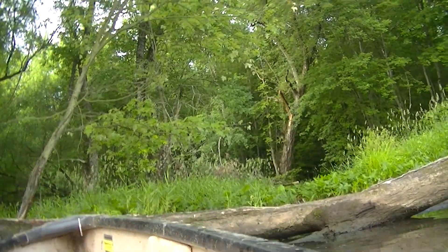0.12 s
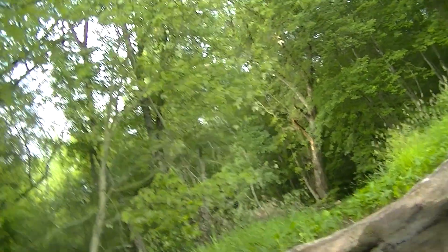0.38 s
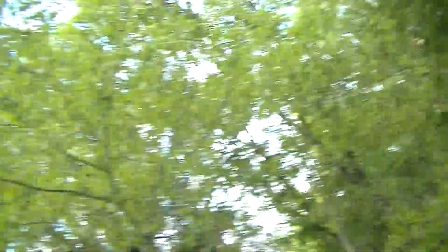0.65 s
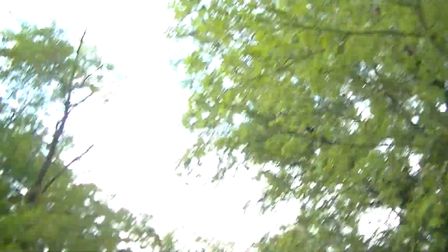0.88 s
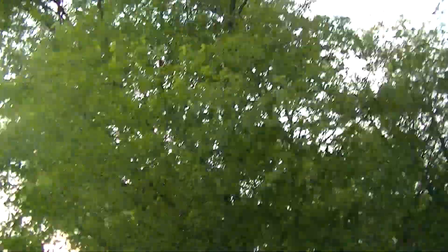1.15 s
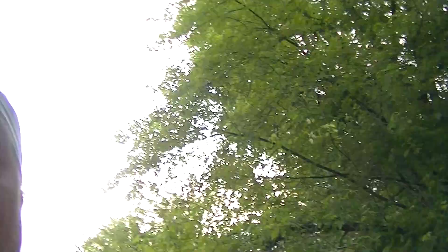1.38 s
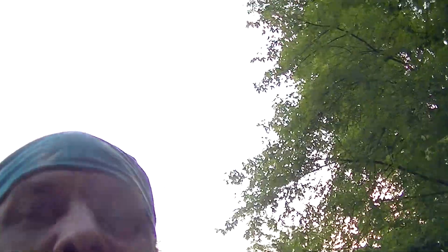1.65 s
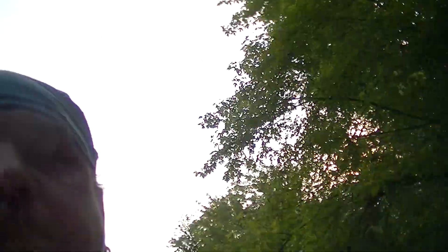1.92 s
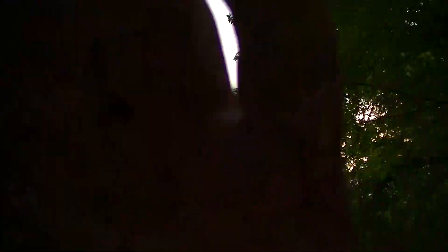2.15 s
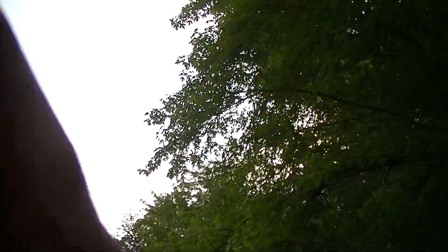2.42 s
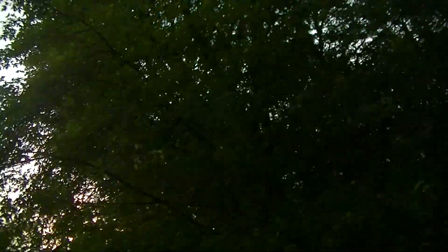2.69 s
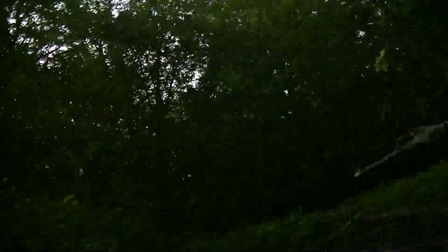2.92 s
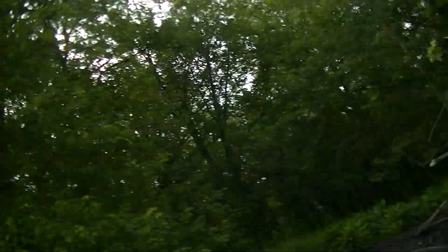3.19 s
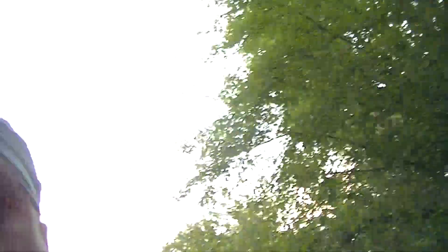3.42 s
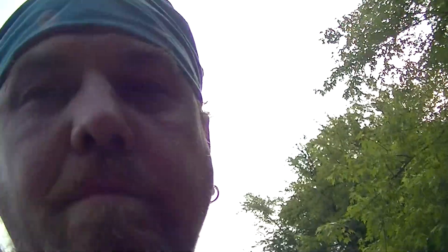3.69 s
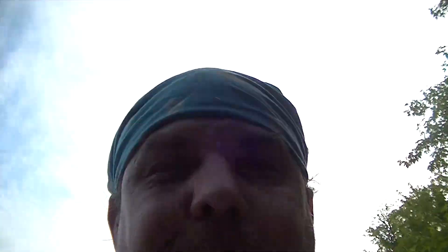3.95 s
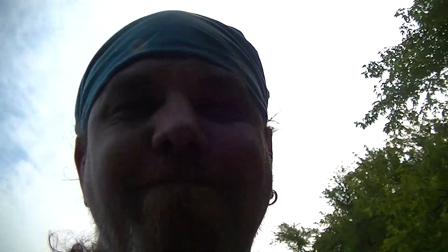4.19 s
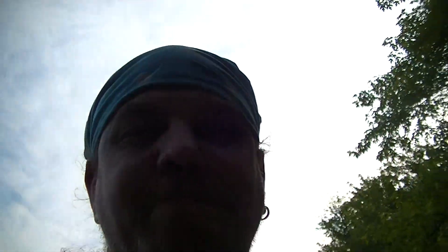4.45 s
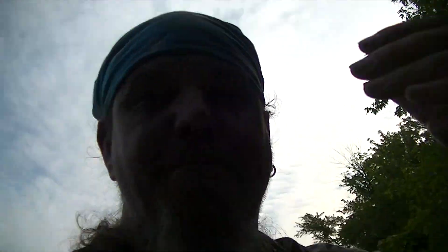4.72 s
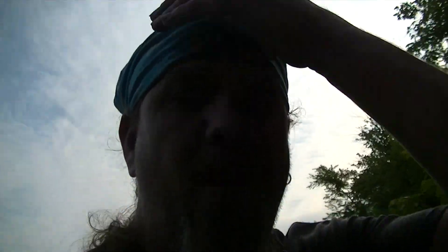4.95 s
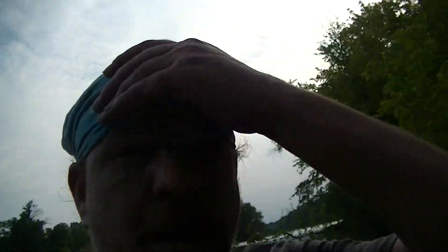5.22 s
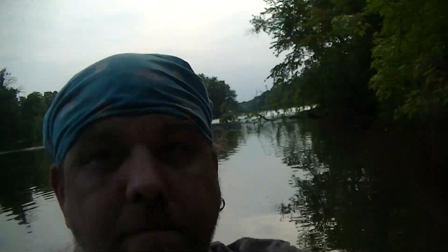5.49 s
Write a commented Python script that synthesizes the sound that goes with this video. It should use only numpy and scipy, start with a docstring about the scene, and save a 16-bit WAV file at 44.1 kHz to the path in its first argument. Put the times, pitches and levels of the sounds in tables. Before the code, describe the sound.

A small camera is rubbed, knocked and snapped about in a boat, loud clunks over faint river wash, then a songbird whistles and chips.

```python
"""A hand handles a small camera in a boat on a wooded river: friction noise rubs over its case, plastic
parts snap and ping as decaying tones, its mount knocks on the modes of the hull and creaks by stick-slip.
A songbird nearby sings near-sine whistles and falling chips, modulated in level and phase, which ring on
among the trees as sparse echoes. River and leaves are a soft wash of shaped noise."""
import sys
import numpy as np
from scipy import signal
from scipy.io import wavfile
from scipy.ndimage import uniform_filter1d

SR = 44100
rng = np.random.default_rng(int(sys.argv[2]) if len(sys.argv) > 2 else 0)


def to_wav(s):
    """Save 16-bit WAV."""
    ch = np.atleast_2d(s).T  # columns
    pcm = np.round(np.clip(ch, -1, 1) * 32767)  # PCM
    wavfile.write(sys.argv[1], SR, pcm.astype(np.int16))


def how_loud(loudness_db):
    """Turn decibels into a plain amplitude multiplier (0 dB gives 1, 20 dB gives 10)."""
    steps = np.asarray(loudness_db, float) / 20
    return 10 ** steps


N = 246959
BIN_HZ, FRAME_S = np.fft.rfftfreq(512, 1 / SR), np.arange(N // 128 + 5) * 128 / SR  # noise grid


def evened(x):
    """Normalization: scales to rms 1."""
    return x / np.sqrt(np.mean(x ** 2) + 1e-20)


def peaked(x, db):
    """Normalization: scales to a peak level."""
    return how_loud(db) * x / abs(x).max()


def read(points, hz):
    """Spectral envelope: interpolates points on a log-frequency axis."""
    f, value = np.transpose(points)
    return np.interp(np.log(hz + 1), np.log(f + 1), value)


def bump(hz, width):
    """Resonance curve: a single peak over the noise bins, width at half height."""
    return 1 / (1 + (2 * (BIN_HZ - hz) / width) ** 2)


def band(x, lo_hz, hi_hz):
    """Band-pass filtering with gentle slopes."""
    edges = np.clip([lo_hz, hi_hz], 50, 20000)
    return signal.sosfilt(signal.butter(2, edges, "bandpass", fs=SR, output="sos"), x)


def add(mix, s, sound, pan_db):
    """Intensity stereo: places a sound in time; pan_db is the level of left over right."""
    part = mix[:, round(s * SR):][:, :len(sound)]
    part += how_loud([[pan_db / 2], [-pan_db / 2]]) * sound[:part.shape[1]]


def ring(modes, stretch, size):
    """Modal synthesis: dying sines of alternating sign, as neighbouring modes swing against each other."""
    t = np.arange(size) / SR
    total = np.zeros(size)
    for k, (hz, db, t60) in enumerate(modes):
        decay = how_loud(db - 60 * t / (t60 * stretch))
        total += (-1) ** k * decay * np.sin(2 * np.pi * hz * t)
    return total


def crowd(table, count):
    """Modal density: many close modes at chance places and strengths under a smooth outline."""
    edges_hz, outline_db, outline_t60 = np.transpose(table)
    place, strength = rng.random((count, 2)).T
    hz = edges_hz[0] * (edges_hz[-1] / edges_hz[0]) ** ((np.arange(count) + place) / count)
    db = np.interp(np.log(hz), np.log(edges_hz), outline_db)
    t60 = np.interp(np.log(hz), np.log(edges_hz), outline_t60)
    return np.transpose([hz, db - 5 * strength, t60])


def hiss(field_db, same, patchy_db):
    """Partial coherence: stereo noise of random short-time spectra shaped by a bins x frames field."""
    a, b, c, d, patches = rng.standard_normal(field_db.T.shape + (5,)).T
    patches = uniform_filter1d(patches, size=6, axis=0)
    patches = evened(uniform_filter1d(patches, size=12, axis=1))
    left = a + 1j * b
    right = same * left + np.sqrt(1 - same ** 2) * (c + 1j * d)
    spectra = np.array([left, right]) * how_loud(field_db + patchy_db * patches)
    return signal.istft(spectra, nperseg=512, noverlap=384)[1][:, :N]


# Spectrum of river and leaves: (frequency [Hz], relative density [dB])
WASH_SPECTRUM = [(24, -63.5), (40, -42), (222, -7), (562, -2), (761, 0), (1110, -3.5), (2080, -6.5),
                 (2300, -6.5), (4660, -9.5), (8740, -17), (12800, -20.5), (15200, -24), (16400, -33.5)]
# Left-right likeness of the wash: (frequency [Hz], correlation [0-1])
WASH_LIKENESS = [(60, 0.5), (180, 0.93), (550, 0.87), (1650, 0.76), (4970, 0.87), (15000, 0.97)]


def wash():
    """Superposed far sources: river and leaves merge into smooth, partly coherent noise."""
    same = np.clip(read(WASH_LIKENESS, BIN_HZ), -1, 1)[:, None]
    field_db = read(WASH_SPECTRUM, BIN_HZ)[:, None] + 0 * FRAME_S
    return how_loud(-52.5) * evened(hiss(field_db, same, patchy_db=2.2))


# Strokes of a hand sliding on the case:
# (start [s], length [s], relative pressure [dB], hollow ring [dB], port whistle [dB])
STROKES = [(0.0, 0.19, -52.5, -12, 2), (0.173, 0.069, -49, 14, -11), (0.203, 0.097, -46, 6, 8.5),
           (0.269, 0.1, -43, 7.5, 9), (0.311, 0.13, -52.5, 5, -5), (0.492, 0.19, -47, -19, -2.5),
           (0.701, 0.063, -54.5, 9, -2), (0.771, 0.15, -44, 12.5, 0.5), (0.859, 0.22, -45.5, 11.5, -4.5),
           (1.025, 0.35, -44, 5.5, 0.5), (1.248, 0.25, -47.5, 5, -3), (1.352, 0.36, -43, 3, 2.5),
           (2.53, 0.082, -59.5, 6, 5), (2.628, 0.19, -50, -20, 5), (2.776, 0.14, -57.5, -10, 5.5),
           (3.176, 0.046, -53, -7, -1), (3.28, 0.093, -55.5, 1, -10)]
# Spectrum of skin on plastic: (frequency [Hz], relative density [dB])
RUB_SPECTRUM = [(59, -67), (100, -66), (343, -2.5), (424, -8), (721, -4), (950, -8), (1080, -5),
                (1610, -12), (4380, -12), (8640, -34.5), (16000, -46.5)]
# Fixed rings of the case: (frequency [Hz], width [Hz], height [dB])
RUB_RESONANCES = [(1980, 270, 7), (2370, 170, 3.5), (6500, 840, 4.5)]
# Rings that open and shut under the palm: (frequency [Hz], width [Hz])
PALM_HOLLOW = [(1080, 36), (1400, 300)]
# The microphone opening sings as skin passes it: (frequency [Hz], width [Hz])
MIC_PORT = (4600, 850)


def rubs():
    """Friction noise: skin drags on plastic through the case's resonances, one swell for each stroke."""
    skew, point = 1.15, 0.9  # the pressure swells to a late top and lets go
    bright_db, bright_per_db, usual_db = 3.0, 0.079, -43.5  # tilt [dB/octave] at usual pressure; harder is brighter
    colour_db = read(RUB_SPECTRUM, BIN_HZ) + sum(db * bump(hz, width) for hz, width, db in RUB_RESONANCES)
    hollow = sum(bump(hz, width) for hz, width in PALM_HOLLOW)
    octaves = np.log2((BIN_HZ + 100) / 3000)
    power = 1e-20
    for s, length, db, hollow_db, port_db in STROKES:
        progress = np.clip((FRAME_S - s) / length, 0, 1)
        swell = np.sin(np.pi * progress ** skew).clip(0) ** point
        tilt_db = (bright_db + bright_per_db * (db - usual_db)) * octaves
        shape_db = db + colour_db + tilt_db + hollow_db * hollow + port_db * bump(*MIC_PORT)
        power = power + np.outer(how_loud(shape_db), swell) ** 2
    flicker_db = 1.8 * rng.standard_normal(len(FRAME_S))
    return hiss(10 * np.log10(power) + flicker_db - 3, 0.93, patchy_db=1.4)


def sing(out, s, tone, db, taper):
    """Amplitude windowing: tapers a bird's note at both ends and sets its level."""
    add(out, s, np.sqrt(2) * how_loud(db) * tone * signal.windows.tukey(len(tone), taper), 0.4)


# Clear chips: (start [s], length [s], start pitch [Hz], end pitch [Hz], nominal level [dB])
CLEAR_CHIPS = [(0.044, 0.023, 11700, 9800, -50.5), (0.072, 0.01, 7000, 5260, -40),
               (0.079, 0.0113, 4820, 3550, -39), (4.785, 0.04, 3760, 3250, -49),
               (4.837, 0.015, 6020, 5150, -31), (4.842, 0.0086, 5770, 4020, -32),
               (5.24, 0.0288, 3760, 3150, -45), (5.25, 0.016, 7000, 6500, -45.5),
               (5.288, 0.017, 5800, 5330, -30), (5.294, 0.011, 5610, 3850, -32.5),
               (5.55, 0.015, 7500, 6740, -45), (5.562, 0.0044, 7300, 4670, -27.5)]
# Buzzed notes: (start [s], length [s], start pitch [Hz], end pitch [Hz], nominal level [dB])
BUZZED_NOTES = [(4.745, 0.042, 7200, 4530, -48.5), (4.804, 0.039, 6423, 6280, -38),
                (5.261, 0.027, 6090, 5980, -34.5), (5.512, 0.029, 2810, 4020, -38)]


def chips():
    """Phase modulation: an unsteady buzz puts side lines on gliding sines, faint or strong by its depth."""
    out = np.zeros((2, N))
    for notes, buzz_rad in ((CLEAR_CHIPS, 0.11), (BUZZED_NOTES, 1.47)):
        for s, length, start_hz, end_hz, db in notes:
            t = np.arange(0, length, 1 / SR)
            turn = 2 * np.pi * np.cumsum(start_hz + (end_hz - start_hz) * t / length) / SR
            waver = 1.86 * uniform_filter1d(rng.standard_normal(len(t)), size=40)
            buzz_cycles = np.cumsum(486 * (1 + waver)) / SR  # about 486 Hz
            sing(out, s, np.sin(turn + buzz_rad * np.sin(2 * np.pi * buzz_cycles)), db, taper=0.6)
    return out


def echoes(x, t60, after):
    """Multiple scattering: sparse taps of random sign die away, starting some samples after the sound."""
    taps, t = np.zeros((2, SR)), np.arange(SR) / SR
    slots = np.arange(after, SR - 20, 20)
    at = slots + rng.integers(0, 20, (2, len(slots)))
    np.put_along_axis(taps, at, rng.choice([-1., 1.], at.shape), 1)
    taps = (taps + 0.62 * taps[::-1]) * how_loud(-60 * t / t60)  # the two sides share part of the echo
    return signal.fftconvolve(x, taps / np.linalg.norm(taps[0]), axes=1)[:, :N]


def trees(song, handling):
    """Reverberation: near twigs blur each note; trunks and banks answer long after, handling only faintly."""
    scattered = song + how_loud(2.0) * band(song, 3340, 18000)  # leaves scatter the highest notes most
    near = how_loud(-13) * echoes(scattered, t60=0.03, after=40)
    far = echoes(how_loud(-12) * scattered + how_loud(-35) * handling, t60=0.95, after=300)
    return near + far


# Snaps of the plastic case: (time [s], nominal peak [dB], click pitch [Hz],
# case ring re click [dB], treble crack re click [dB])
CASE_SNAPS = [(0.188, -34, 3540, -1, -2), (0.195, -32, 3270, 1.5, -4), (0.5244, -32.5, 5040, -2.5, -18.5),
              (0.772, -22.5, 3340, -2.5, -34), (1.921, -18.5, 2120, -6, -32),
              (2.295, -36, 4670, 11.5, -23.5), (2.299, -12.5, 3730, 1, -12), (2.304, -20, 4150, -14, -3),
              (2.307, -22, 4460, -21, -12), (2.391, 0.5, 2730, -7, -6.5), (2.437, 0.5, 3810, -18, -22),
              (2.495, -10, 4400, -9.5, -8), (2.61, -16, 4080, -9, 0), (2.613, -9, 4600, -13, -7),
              (2.626, -6, 1404, -7.5, -8), (2.654, -19, 2810, -38, -1), (2.6571, -15.5, 2640, -32, -18.5),
              (2.659, -19, 2550, -50, -2.5), (2.662, -17.5, 2650, -33, -18), (2.674, -26, 2910, -19, -7),
              (2.701, -16.5, 3430, -7.5, -16), (2.714, -34.5, 1425, 6, -18), (2.744, -18, 3830, -8, -35),
              (2.757, -30, 1343, -3, -19), (2.901, -9, 2210, -5, -37), (2.9399, -12, 1880, -7, -14),
              (2.9413, -5.5, 3020, -10, -20), (2.9483, -30.5, 3000, 12, -27), (2.9513, 0, 1788, -4.5, -4.5),
              (3.003, -29, 1340, -12, -21), (3.019, -13, 4060, -5, -12), (3.147, -15.5, 2540, -2.5, -12.5),
              (4.98, -34, 4000, -24.5, -2), (5.001, -34, 4000, -7, -4), (5.011, -38, 1830, 2, -18),
              (5.076, -29.5, 8000, -22.5, -12), (5.105, -35, 6500, -27, -6),
              (5.141, -24.5, 2870, -27, -1.5), (5.151, -40, 6500, -25, 8), (5.2, -25, 3070, -6.5, -1.5),
              (5.356, -26, 3010, -7.5, -2)]
# Clear modes of the case: (frequency [Hz], relative level [dB], decay t60 [s])
CASE_MODES = [(1425, -18, 0.11), (3340, -26, 0.13)]
# Outline of its dense modes: (frequency [Hz], relative level [dB], decay t60 [s])
CASE_OUTLINE = [(449.8, -22.5, 0.058), (1050, -5, 0.029), (1390, -2.5, 0.033), (2470, -9, 0.034),
                (4130, 4, 0.015), (8000, -11.5, 0.014)]


def snaps():
    """Impulse excitation: a click of a few cycles, a treble crack, a breath of scatter, the case ringing."""
    out, t = np.zeros((2, N)), np.arange(2000) / SR
    chances = rng.standard_normal((len(CASE_SNAPS), 2000))
    for (s, db, hz, ring_db, crack_db), chance in zip(CASE_SNAPS, chances):
        pan_db = np.clip(7.5 * np.log2(hz / 3030), -4.5, 4.5)  # small high parts sit left, large low ones right
        click = -np.sin(2 * np.pi * hz * t) * (hz * t) ** 2 * np.exp(-hz * t / 0.5)
        crack = band(chance * np.exp(-t / 0.00044), 3640, 9100)
        scatter = band(chance[::-1] * np.exp(-t / 0.0014), 0.46 * hz, 1.12 * hz)
        add(out, s, peaked(click, db) + peaked(crack, db + crack_db) + peaked(scatter, db - 8), pan_db)
        modes = np.vstack([CASE_MODES, crowd(CASE_OUTLINE, count=20)])
        add(out, s, peaked(ring(modes, 1, size=2600), db + ring_db), pan_db)
    return out


# Knocks on the hull: (time [s], nominal peak [dB], hardness [dB/octave],
# boom of the low modes [dB], ring time factor [1])
HULL_KNOCKS = [(0.583, -5, 3.5, 5, 1.06), (0.715, -52, 9, -6, 1.1), (0.732, -36.5, 0, -15, 1.1),
               (1.002, -9, 2, 3, 1.06), (1.065, -18, 2.5, 7, 1.18), (2.09, -5.5, 2.5, -1, 1.09),
               (2.14, -13.5, -1, -5.5, 1.02), (3.034, -43, -3, 13, 0.28), (4.766, -22.5, 9, 4, 0.33),
               (4.954, -20.5, -4, -5.5, 0.86), (5.051, -3.5, 4, 1.5, 0.99), (5.356, -36.5, -8, 16, 0.19),
               (5.472, -36.5, -1.5, 4.5, 0.47)]
# Clear modes of the hull: (frequency [Hz], relative level [dB], t60 before the ring time factor [s])
HULL_MODES = [(326.6, -8, 0.16), (401.4, -14.5, .18), (649, 4.5, 0.048), (877.5, 2, 0.052),
              (990, 0.5, 0.019), (1341, 4.5, 0.018), (1617, -6.5, 0.014), (1860, -12, 0.018)]
# Outline of its dense modes: (frequency [Hz], relative level [dB], t60 before the ring time factor [s])
HULL_OUTLINE = [(141.3, -7, 0.094), (314, -11, 0.13), (497, -10.5, 0.18), (900, 4, 0.057),
                (1600, -5, 0.053), (2660, -15.5, 0.035), (4620, -22.5, 0.034), (7000, -31.5, 0.02)]


def knocks():
    """Modal excitation: a blow rings clear and crowded hull modes; harder blows favour the high ones."""
    out = np.zeros((2, N))
    for s, db, hard_db, boom_db, stretch in HULL_KNOCKS:
        dense = crowd(HULL_OUTLINE, count=56) + [0, -4.5, 0]
        hz, mode_db, t60 = np.vstack([HULL_MODES, dense]).T
        blow_db = mode_db + hard_db * np.log2(hz / 900) + boom_db * (hz < 500)
        body = ring(zip(hz, blow_db, t60), stretch, size=7000)
        rise = np.minimum(np.arange(len(body)) / SR / 0.00224, 1)
        add(out, s, peaked(body * rise, db), pan_db=0.63)
    return out


# Soft short pings: (time [s], nominal peak [dB], pitch [Hz], length scale [s], left over right [dB])
SOFT_PINGS = [(1.463, -33, 734, 0.017, -3), (1.855, -37, 4250, 0.015, 2), (2.3506, -26.5, 3340, 0.0011, 2),
              (4.981, -25, 2220, 0.005, 0.5), (4.999, -36, 2540, 0.012, -1),
              (5.01, -32.5, 3580, 0.0063, -1)]


def pings():
    """Damped oscillation: short rounded tones with a soft start."""
    out = np.zeros((2, N))
    for s, db, hz, length, pan_db in SOFT_PINGS:
        u = np.arange(0, 2, 1 / (length * SR))
        tone = u * np.exp(-u / 0.14) * np.sin(2 * np.pi * hz * length * u)
        add(out, s, peaked(tone, db), pan_db)
    return out


# Creaks of the mount, runs of slips: (first slip [s], length [s], mean gap [s], nominal peak [dB])
SLIP_RUNS = [(3.334, 0, .01, -41), (3.437, .046, .046, -39), (3.541, .049, .0122, -36),
             (3.689, .019, .019, -36), (3.758, .058, .0145, -35), (4.061, .004, .004, -39),
             (4.069, .006, .0055, -31), (4.083, .003, .003, -24), (4.094, 0, .01, -38),
             (4.118, 0, .01, -34.5), (4.448, 0, .01, -35)]
# Low and high mode of the mount: (frequency [Hz], t60 before a factor of 0.95 [s])
MOUNT_MODES = [(730, 0.02), (1600, 0.015)]


def creaks():
    """Stick-slip: the joint slips at slightly uneven gaps; each slip rings two short modes."""
    out = np.zeros((2, N))
    (low_hz, low_t60), (high_hz, high_t60) = MOUNT_MODES
    chances = rng.standard_normal((len(SLIP_RUNS), 12, 3))
    for (first, length, gap, db), chance in zip(SLIP_RUNS, chances):
        for s, (late, hard, bright) in zip(first + np.arange(0, length + gap / 2, gap), chance):
            modes = [(low_hz, 0, low_t60), (high_hz, -1.5 + 5 * bright, high_t60)]
            slip = ring(modes, 0.95, size=1500)
            add(out, s + 0.08 * gap * late, peaked(slip, db + 2.5 * hard), 0)
    return out


# Long whistles: (start [s], length [s], pitch [Hz], sag [Hz/s], nominal level [dB])
LONG_WHISTLES = [(4.637, 0.14, 4257, 537, -26.5), (5.072, 0.17, 4164, 217, -24.5)]


def whistles():
    """Amplitude and phase modulation: the throat's pulsing puts side lines on a sagging near-sine."""
    out = np.zeros((2, N))
    onset_s, top_s, end_s = 0.026, 0.062, 0.021  # quick rise, top of the swell, closing drop
    for s, length, hz, sag_hz, db in LONG_WHISTLES:
        t = np.arange(0, length, 1 / SR)
        sharp_hz = 60 * np.exp(-t / 0.03)  # each starts a little sharp
        drop_hz = 70.4 * np.clip(1 - (length - t) / end_s, 0, 1)
        turn = 2 * np.pi * np.cumsum(hz + sharp_hz - sag_hz * t - drop_hz) / SR
        level_db = db + np.interp(t, [0, onset_s, top_s, length], [-22, -6, 0, -14])
        pulse = 2 * np.pi * 294 * t
        depth = np.interp(t, [0, top_s, length], [0.4, 0.68, 0.8])
        husky = 1 + 1.6 * uniform_filter1d(rng.standard_normal(len(t)), size=120)
        tone = husky * (1 + depth * np.cos(pulse)) * np.sin(turn + 0.18 * np.sin(pulse))
        sing(out, s, tone, level_db, taper=0.15)
    return out


# The second voice: (start [s], length [s], top pitch [Hz], nominal level [dB], octave re fundamental [dB])
SECOND_VOICE = [(4.642, 0.12, 2907, -42, -11), (5.082, 0.112, 2935, -41, -11),
                (5.442, 0.057, 3340, -33, -31), (5.55, 0.051, 3350, -48.5, -39)]


def low_voice():
    """Harmonic synthesis: a fundamental and its octave arch in pitch and level, each with its own flutter."""
    out = np.zeros((2, N))
    for s, length, hz, db, octave_db in SECOND_VOICE:
        u = np.arange(0, length, 1 / SR) / length
        arch = [0, 0.35, 1]  # start, top and end as parts of the length
        pitch = hz * (1 - 0.03 * np.interp(u, arch, [1, 0, 1]))
        turn = 2 * np.pi * np.cumsum(pitch) / SR
        level_db = db + np.interp(u, arch, [-9, 0, -13])
        noise = uniform_filter1d(rng.standard_normal((len(u), 2)), size=150, axis=0).T
        flutter = 1 + 2.1 * noise * [[2], [4]]
        tone = flutter[0] * np.sin(turn) + flutter[1] * how_loud(octave_db) * np.sin(2 * turn)
        sing(out, s, tone, level_db, taper=0.2)
    return out


def scene():
    """Superposition of all sources; the small case passes little bass of the blows to the microphones."""
    song = chips() + whistles() + low_voice()
    blows = snaps() + knocks() + pings() + creaks()
    handling = signal.sosfilt(signal.butter(4, 170, "highpass", fs=SR, output="sos"), blows)
    return wash() + rubs() + song + trees(song, handling) + handling


def band_limit(x):
    """A steep low-pass at the top of the band."""
    return signal.sosfilt(signal.butter(12, 16550, fs=SR, output="sos"), x)


def record(dry):
    """Saturation: peaks beyond full scale are clipped."""
    finished = np.clip(dry, -1, 1)
    return band_limit(finished)


dry = scene()
out = record(dry)
to_wav(out)
```